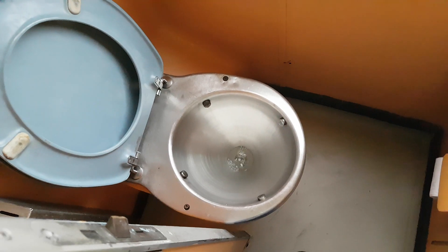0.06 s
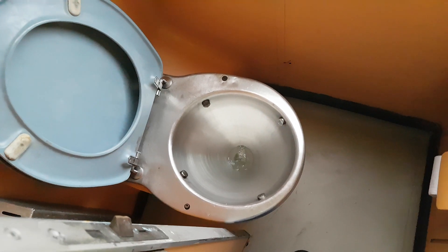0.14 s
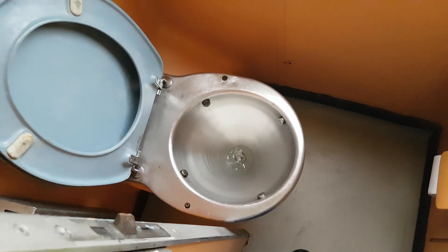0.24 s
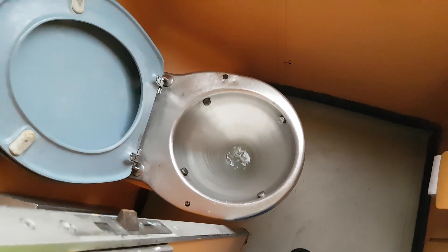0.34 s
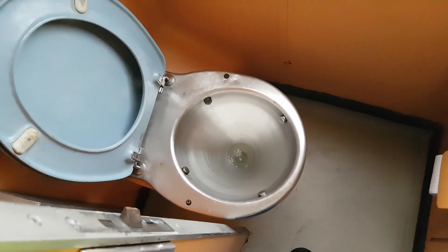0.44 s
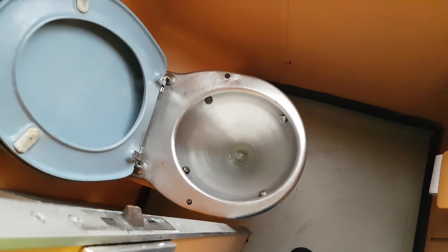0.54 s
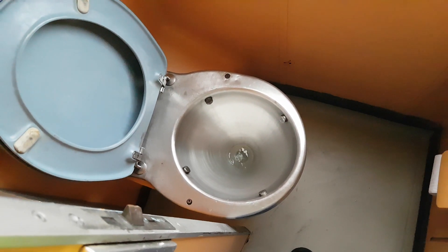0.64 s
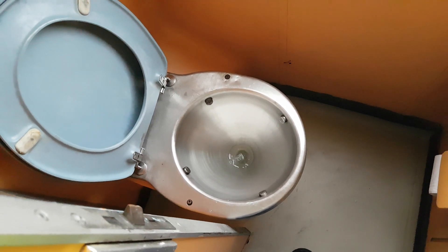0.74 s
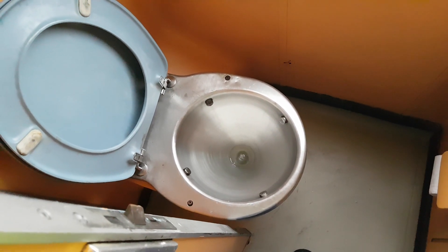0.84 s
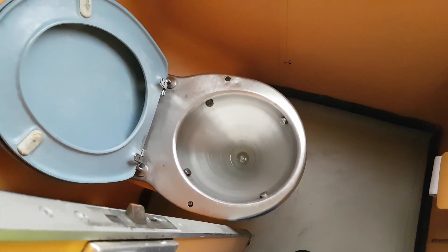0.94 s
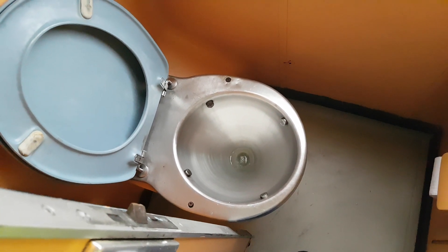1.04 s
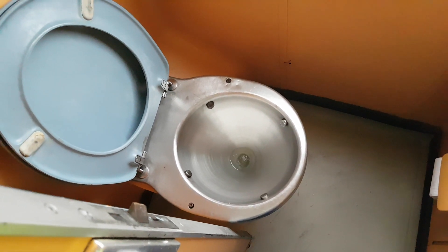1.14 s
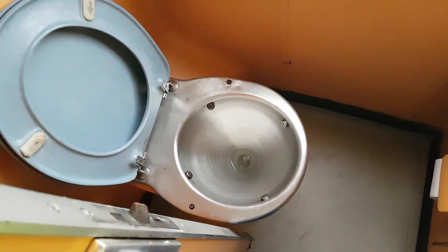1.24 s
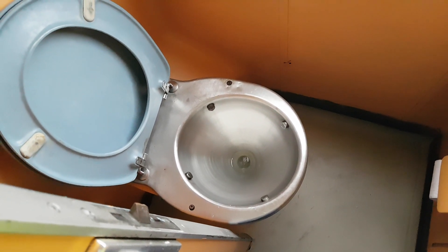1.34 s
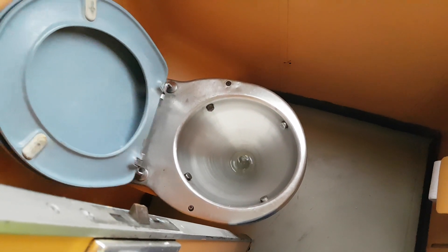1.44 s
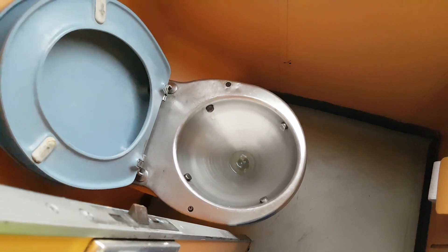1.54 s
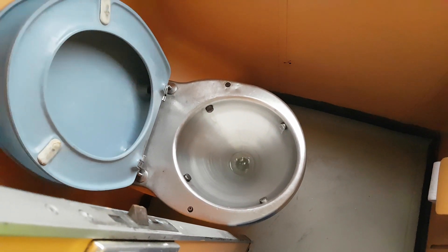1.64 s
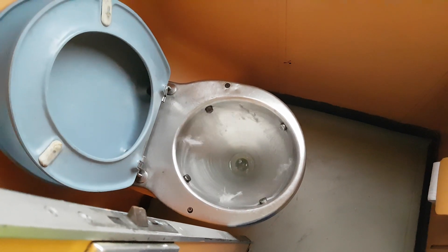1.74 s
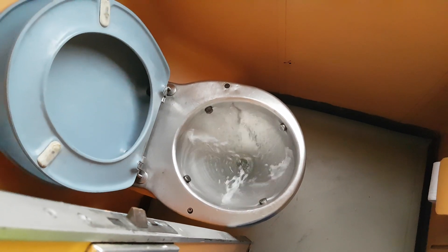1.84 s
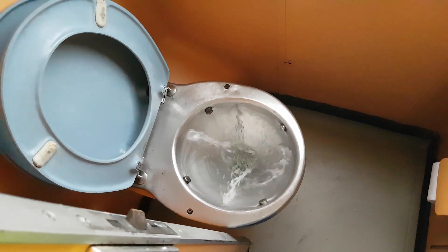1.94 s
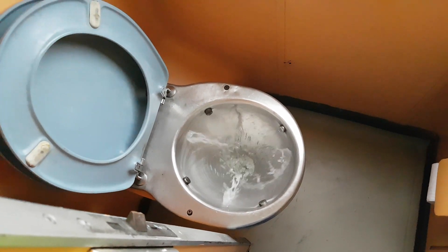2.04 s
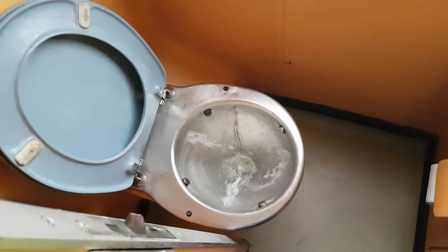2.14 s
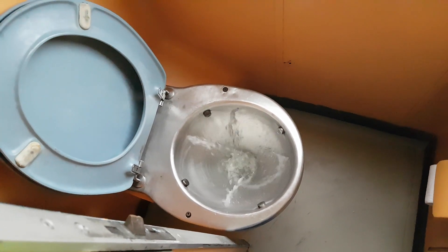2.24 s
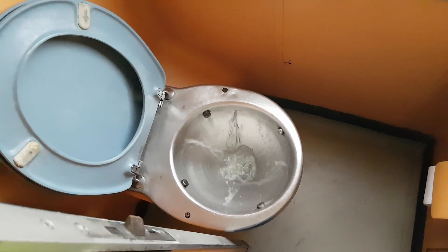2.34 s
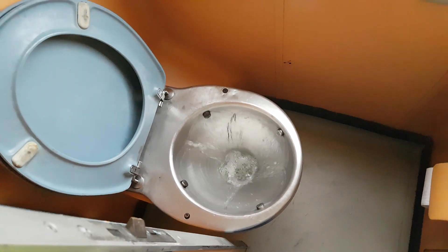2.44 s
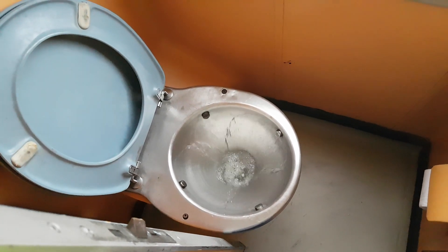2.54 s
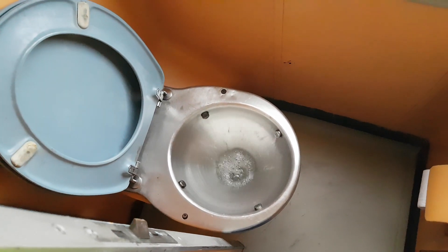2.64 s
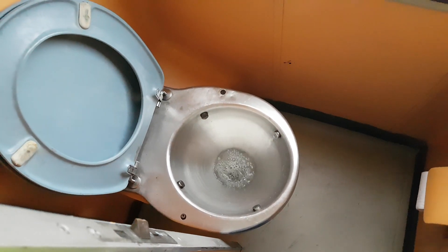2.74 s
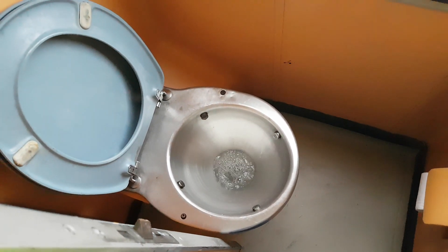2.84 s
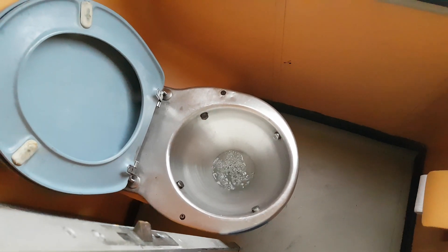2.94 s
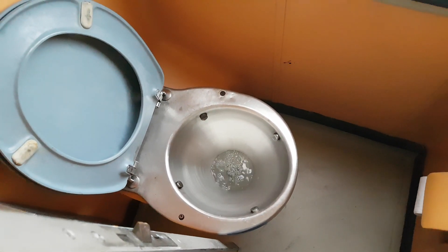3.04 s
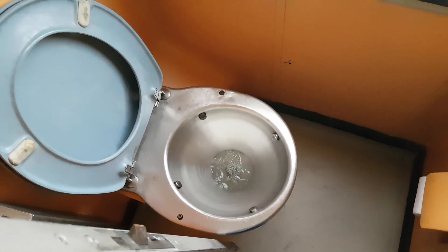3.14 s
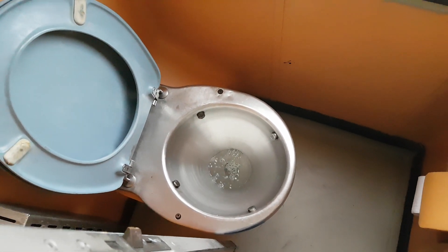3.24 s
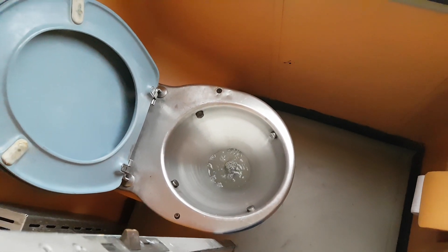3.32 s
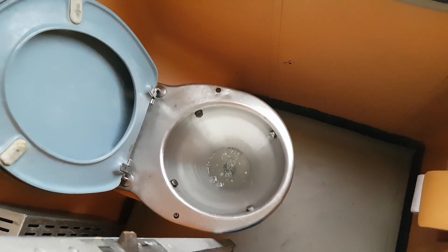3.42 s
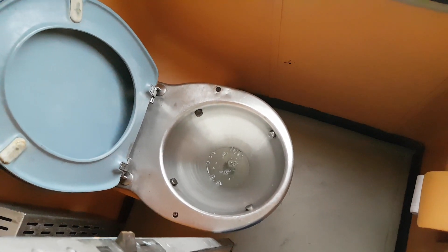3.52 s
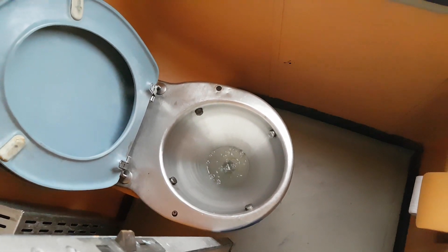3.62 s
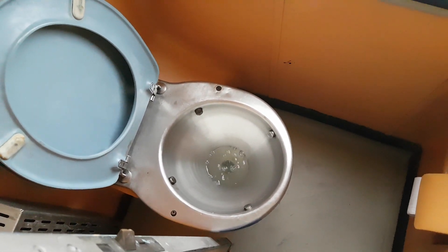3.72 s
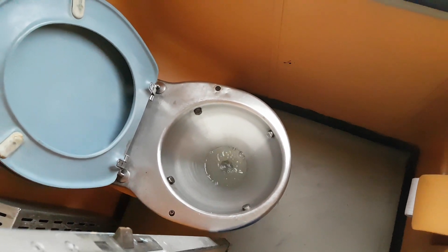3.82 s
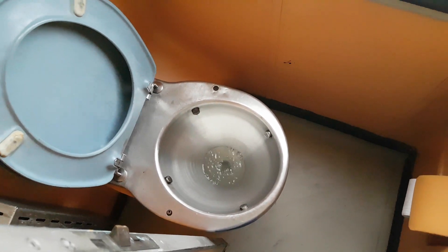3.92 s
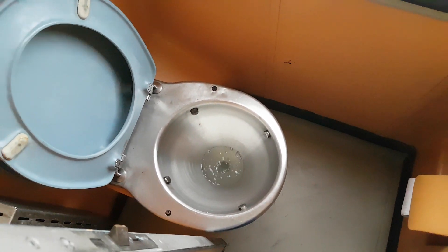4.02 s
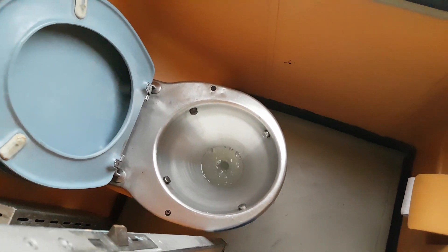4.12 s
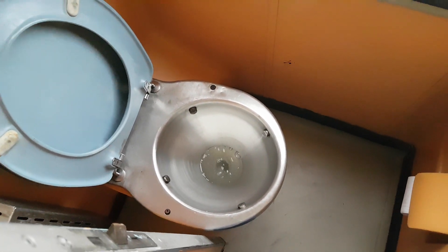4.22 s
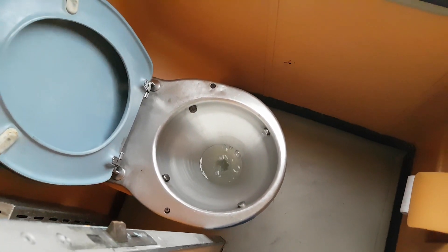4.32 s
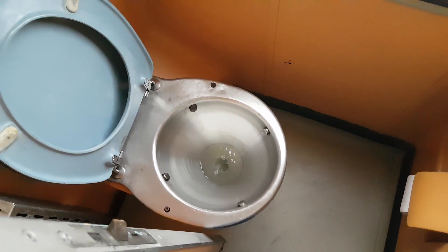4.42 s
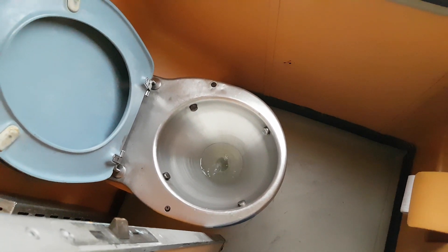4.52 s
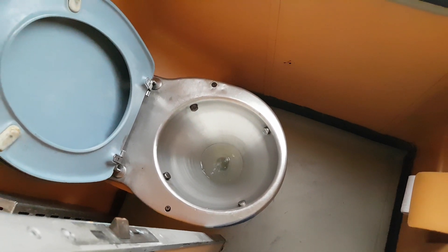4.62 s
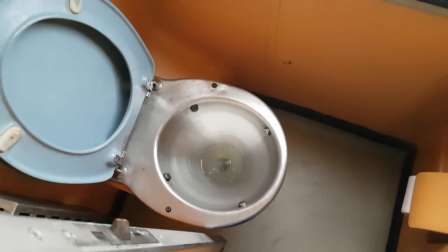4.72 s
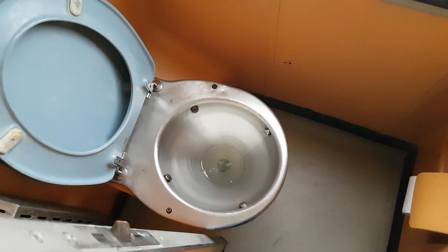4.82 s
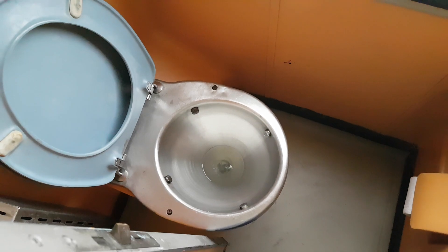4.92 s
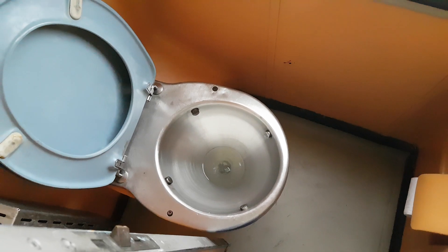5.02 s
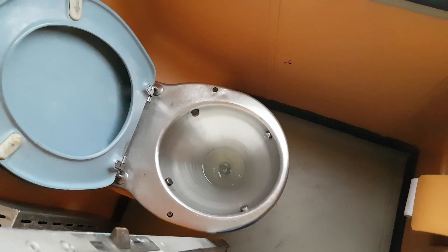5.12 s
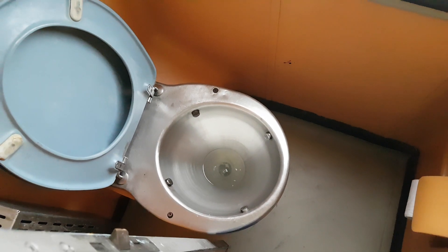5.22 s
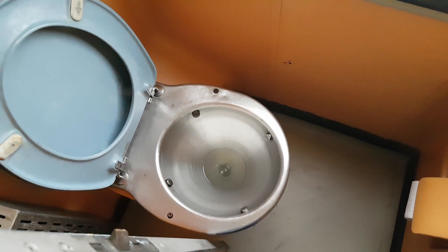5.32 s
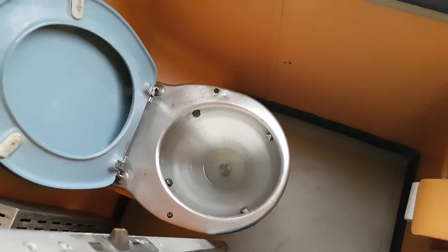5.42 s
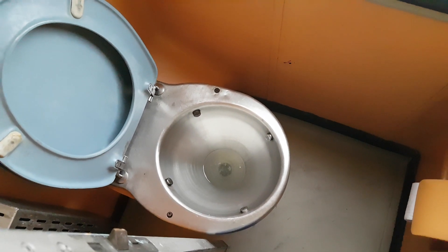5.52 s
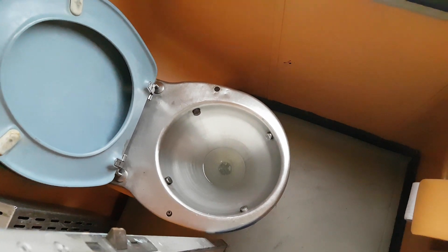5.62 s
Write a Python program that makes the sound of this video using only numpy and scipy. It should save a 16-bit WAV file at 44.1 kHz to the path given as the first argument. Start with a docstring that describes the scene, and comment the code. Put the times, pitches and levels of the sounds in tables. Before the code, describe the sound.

Close to the microphone in a cramped train toilet, a quiet pipe hiss is broken by a sharp burst of air and a hollow, booming bang. Rinse water fizzes against the metal bowl, which hums briefly under suction amid further blasts. After a lull of hiss, rumble and two small drips, the vacuum flush vents and bangs twice more, then fades as a faint refill trickle begins.

```python
"""A vacuum toilet in a small train cubicle, close up on a stereo pair of microphones. A valve seat ticks
and the air ejector hisses through its pipe. At 1.4 s a valve vents a whistling blast and slugs of air and
water bang through the steel bowl; from here on the cabinet booms and throbs. Rinse jets spray, the bowl
hums under suction among more blasts and slugs, and two drips fall near 3 s. Vents and slugs hit again
near 3.9 s and 5.1 s, then the hiss falls away and the tank starts to refill."""
import sys
import numpy as np
from scipy import signal
from scipy.fft import rfft, irfft
from scipy.io import wavfile
from scipy.ndimage import uniform_filter1d

SR = 44100
rng = np.random.default_rng(int(sys.argv[2]) if len(sys.argv) > 2 else 0)


def waveform_to_disk(signal):
    """Save audio, clipped to [-1, 1], as 16-bit WAV at the path in sys.argv[1]."""
    frames = np.transpose(np.atleast_2d(signal))
    scaled = np.clip(frames, -1, 1) * 32767
    samples = np.round(scaled).astype(np.int16)
    wavfile.write(sys.argv[1], SR, samples)


N = 250047
TIME = np.arange(N) / SR

# slugs striking the bowl: t/s, level/dB, rise/s, t60/s, tilt/(dB per octave), hollow f/Hz
SLUGS = [(0.174, -40.5, .0036, 0.19, -3, 895), (1.455, -20, 0.0019, 0.51, 0, 1500),
         (1.472, -8.5, 0.0061, 0.29, 0.3, 2100), (1.512, -12.5, 0.015, 0.23, 3.5, 2820),
         (1.612, -16, .001, 0.19, -0.3, 3940), (1.734, -27.5, 0.0061, 0.27, 2, 1630),
         (2.192, -18.5, 0.0022, 0.29, -1.1, 1070), (2.296, -36.5, 0.0044, 0.55, -6.5, 990),
         (2.4, -14, 0.0041, 0.23, 0.8, 940), (2.595, -31, 0.026, 0.24, -3, 2060),
         (2.64, -42, .014, 0.71, -2, 2050), (2.841, -41.5, 0.0024, 0.68, -3, 1970),
         (3.035, -46, 0.0061, 0.23, -8, 2200), (3.195, -49.5, .005, 0.13, 6, 2200),
         (3.467, -42.5, .002, .35, -1.5, 860), (3.62, -39.5, 0.14, 1, -0.9, 2620),
         (3.924, -17.5, 0.0022, .23, 4, 1300), (3.941, -10, 0.002, 0.38, 0.3, 2100),
         (3.991, -18.5, 0.019, .27, 5, 2530), (4.049, -24, 0.0042, 0.36, -2.5, 2800),
         (4.292, -28, 0.0029, 0.18, -4.5, 1940), (4.346, -31, .0012, 0.25, -0.5, 2190),
         (4.414, -35.5, 0.0014, .24, -2, 1785), (5.093, -28, .0036, 0.41, -4.5, 1100),
         (5.154, -14.5, 0.0039, 0.28, -0.7, 3660), (5.2, -34.5, .013, 0.23, 8.5, 2200),
         (5.3, -52, 0.039, 1, -4.5, 905), (5.567, -60.5, 0.0024, 0.4, -9.5, 590)]
SLUG_COLOUR = [(210, -11.5), (350, -3.5), (665, -8.5), (1530, -7), (2080, -4.5), (2320, -7), (2520, -6),
               (5190, -15), (9090, -46), (13800, -42), (16200, -51)]  # spectrum of the bangs: f/Hz, level/dB
SLUG_DECAY = [(300, 1.13), (2000, 0.91), (6000, 0.93), (16000, 0.25)]  # decay across the spectrum: f/Hz, factor on t60
BOWL_MODES = [(483, 25, 7), (543, 25, 5), (820, 50, 5), (1030, 60, 8), (1170, 30, 4), (1688, 35, 5),
              (1858, 35, 6), (1970, 35, 4), (2040, 60, 6), (2140, 35, 3), (2470, 40, 6), (3461, 40, 4),
              (3624, 40, 5)]  # modes of the steel bowl: f/Hz, width/Hz, lift/dB
SEAT_TICKS = [(0.149, -43), (5.551, -49)]  # dry ticks of a valve seat: t/s, level/dB


def slugs():
    """Ragged bangs, each with the hollow of its air pocket, and valve-seat ticks ring the bowl."""
    frames = dict(nperseg=128, noverlap=96)
    hz, t, noise = signal.stft(air() * flutter(1.5, .004), SR, **frames)
    decay = read(SLUG_DECAY, hz)[:, None]  # the treble dies first
    pitch = hz[:, None] + 150
    power = np.zeros(noise.shape[1:])
    for s, db, rise, t60, tilt_db, hollow_hz in SLUGS:
        at = (t > s) & (t < s + .55)
        slope_db = tilt_db * np.log2(pitch / 2000)
        hollow_db = 6.1 * np.exp(-(np.log2(pitch / hollow_hz) / 0.44) ** 2)
        power[:, at] += (amp(db + slope_db + hollow_db) * burst(t[at] - s, rise, t60 * decay)) ** 2
    for s, db in SEAT_TICKS:
        power += (amp(db) * burst(t - s, rise=0.0022, t60=0.0073)) ** 2
    bangs = signal.istft(noise * np.sqrt(power), **frames)[1][:, :N]
    return colour(bangs, SLUG_COLOUR, BOWL_MODES)


# valve blasts: t/s, hiss level/dB, rise/s, open/s, edge tone index, whistle level/dB
VENTS = [(1.396, -14, 0.0085, 0.061, 0, -15.5), (1.613, -36.5, .002, 0.0042, 0, -62),
         (2.298, -19, 0.008, 0.085, 1, -29), (2.325, -31, 0.018, 0.048, 1, -15),
         (3.68, -54, .015, .03, 1, -57), (3.826, -15, .006, 0.064, 0, -15.5),
         (3.94, -35, .004, .06, 0, -45.5), (4.05, -41, .004, .01, 0, -58.5),
         (5.055, -17, 0.0084, 0.12, 1, -14.5), (5.085, -31.5, .023, 0.049, 2, -21)]
VENT_COLOUR = [(250, -31.5), (400, -7), (1300, -3.5), (1800, -11), (2500, -3.5), (3400, -5), (5000, -0.5),
               (7600, -3.5), (9150, -10), (10500, -0.5), (12500, 0.5), (14500, -6.5), (16300, -23.5)]  # spectrum of the escaping air: f/Hz, level/dB
EDGE_TONES = [
    [(12370, 400, 0), (11300, 1000, -1), (2500, 200, -10)],
    [(13930, 400, 0), (14800, 2600, 0), (7300, 800, -9)],
    [(5700, 260, 0), (6830, 400, -4)],
]  # valve whistles, one list each: f/Hz, width/Hz, level/dB
EDGE_FADES = [.2, 0.44, .6]  # each whistle's own fade within its blast: t60/s


def vents():
    """Each whistling blast starts at once, sags while the valve is open and dies fast when it shuts."""
    jet = air() * flutter(0.93, 0.0018)
    rush = colour(jet, VENT_COLOUR)
    tones = [resonate(jet, modes) for modes in EDGE_TONES]
    treble = signal.oaconvolve(rush, signal.firwin(63, 9000, pass_zero=False, fs=SR)[None], "same")
    out = np.zeros((2, N))
    for s, db, rise, open_s, edge, whistle_db in VENTS:
        at = window(s, .6)
        t = TIME[at] - s
        shutting = amp(-240 * np.maximum(t - open_s, 0))
        hiss = rush[:, at] - treble[:, at] * (1 - amp(-90 * t))  # thins as the pressure falls
        whistle = tones[edge][:, at] * amp(-60 * t / EDGE_FADES[edge])
        out[:, at] += burst(t, rise, t60=1) * shutting * (amp(db) * hiss + amp(whistle_db) * whistle)
    return out


# the hiss as heard: swells with the loud bangs, ducks after them, slowly recovers,
# falls away near the end: t/s, level/dB
HISS_LEVEL = [(0, -61.5), (.16, -60.5), (.178, -40.5), (.26, -45), (.7, -46.5), (1.35, -47), (1.6, -37.5),
              (1.72, -55), (2.7, -44.5), (3.8, -45.5), (4.1, -40.5), (4.2, -56), (4.55, -56), (4.7, -51.5),
              (5.03, -45.5), (5.25, -47), (5.36, -62), (5.6, -66.5), (5.67, -52)]
HISS_COLOUR = [(100, -34), (170, -34), (230, -16), (500, -18.5), (900, -11), (1500, -14.5), (3000, -16),
               (5700, -16), (6400, -25.5), (7500, -19), (9200, -31), (13500, -23.5), (16300, -29.5)]  # spectrum of the hiss: f/Hz, level/dB
PIPE_MODES = [(282, 40, 7), (348, 30, 5.5), (442, 14, 20), (587, 68, 10.5), (663, 29, 3), (863, 160, 9.5),
              (1089, 39, 11), (1200, 17, -0.5), (1346, 22, 6.5), (1660, 31, 12.5), (1970, 98, 9),
              (2150, 78, 6.5), (2290, 40, 10), (2650, 27, 2), (3120, 3.3, 12), (3900, 450, 5),
              (5110, 56, 8.5), (5400, 120, 5), (7600, 560, 2)]  # resonances of the ejector pipe: f/Hz, width/Hz, lift/dB


def ejector():
    """Steady jet noise coloured by its pipe."""
    jet = air() * flutter(0.7, 0.044)
    return amp(curve(HISS_LEVEL)) * colour(jet, HISS_COLOUR, PIPE_MODES)


# rinse jets on steel: t/s, level/dB
SPRAY_LEVEL = [(1.725, -50), (1.746, -29.5), (1.774, -31), (1.898, -26.5), (2.176, -22.5), (2.38, -21.5),
               (2.576, -29.5), (2.682, -49.5), (2.72, -57)]
SPRAY_COLOUR = [(250, -19), (450, -12.5), (700, -17.5), (900, -8), (1200, -12), (1900, -3), (3100, -5.5),
                (5800, 0.5), (7500, -4), (9200, -11.5), (11000, -8), (13500, -6), (16300, -15.5)]  # spectrum of the spray: f/Hz, level/dB
REFILL_LEVEL = [(5.59, -70), (5.6, -53.5), (5.65, -48.5), (5.67, -49)]  # refill trickle: t/s, level/dB
REFILL_COLOUR = [(880, -48.5), (1500, -9), (2130, -19.5), (2490, -6), (3260, -15.5), (6110, -4),
                 (16200, -33)]  # spectrum of the trickle: f/Hz, level/dB


def rinse():
    """Dense fizz of water jets lightly rings the bowl; later a thin trickle refills the tank."""
    light_modes = [(hz, width, .5 * lift) for hz, width, lift in BOWL_MODES]
    jets = air() * flutter(0.95, 0.0083)
    spray = amp(curve(SPRAY_LEVEL)) * colour(jets, SPRAY_COLOUR, light_modes)
    refill = amp(curve(REFILL_LEVEL)) * colour(jets, REFILL_COLOUR)
    return spray + refill


THUMPS = [(1.39, -42, -39), (1.45, -25.5, -40.5), (1.54, -33, -29), (1.75, -42.5, -56), (1.91, -41, -65),
          (2.16, -34.5, -38.5), (2.22, -31.5, -31), (2.285, -28, -40), (2.362, -21, -24.5),
          (2.42, -22, -26.5), (2.619, -25.5, -31.5), (2.98, -35.5, -35.5), (3.16, -40.5, -53),
          (3.33, -43.5, -57), (3.44, -40.5, -63), (3.6, -31, -49.5), (3.71, -33.5, -47),
          (3.802, -30.5, -30), (3.915, -14.5, -20.5), (3.98, -26, -24), (4.33, -40, -49), (4.66, -47, -54),
          (4.83, -43, -44), (5.03, -29.5, -35), (5.119, -20.5, -27.5), (5.19, -23, -24.5), (5.59, -43, -49)]  # pipework shaking the cabinet: t/s, boom level/dB, drone level/dB
MURMUR = [(0, -78), (1.36, -75), (1.45, -62.5), (2.5, -46.5), (5.0, -49), (5.67, -52.5)]  # pipework between thumps: t/s, level/dB
BOOM_MODES = [(56.6, 24.3, -0.5), (111.9, 29.7, 3), (80.8, 13, -2.5), (144.7, 31, -2)]  # low panel modes: f/Hz, width/Hz, level/dB
DRONE_MODES = [(270.4, 23, -0.5), (320.6, 78, -0.5)]  # higher panel modes: f/Hz, width/Hz, level/dB
THROBS = [(0.175, -40, 261.5, 0.069), (1.456, -10, 291, 0.022), (1.473, -12.5, 340, 0.042),
          (1.511, -18, 325, 0.067), (1.618, -34, 275, 0.062), (1.931, -37.5, 260, 0.017),
          (2.093, -41, 293, 0.085), (2.206, -16.5, 310, 0.012), (2.275, -32, 300, 0.065),
          (2.355, -20, 268, 0.016), (2.399, -23, 350, 0.055), (2.572, -29.5, 262, 0.046),
          (2.63, -22, 262, 0.064), (2.837, -30.5, 274, 0.045), (2.976, -29, 265, 0.037),
          (3.065, -34, 264, 0.029), (3.127, -28.5, 274, 0.037), (3.306, -36.5, 260, 0.048),
          (3.443, -27, 261, 0.054), (3.568, -39, 264, 0.041), (3.602, -33.5, 267.6, 0.052),
          (3.742, -26.5, 256, 0.058), (3.858, -25, 274, 0.075), (3.925, -8, 311, 0.016),
          (3.969, -10.5, 340, 0.017), (4.006, -17.5, 270.4, 0.05), (4.307, -32, 333, 0.038),
          (4.409, -37, 312, 0.03), (4.606, -36, 262, 0.077), (4.848, -38, 256, 0.1),
          (4.939, -34.5, 265, 0.042), (5.053, -24, 302, 0.02), (5.116, -19.5, 267.3, 0.15),
          (5.15, -18, 349, 0.074), (5.176, -16, 266.3, 0.054), (5.224, -33.5, 259, 0.06),
          (5.294, -33, 269, 0.06)]  # throbs of one panel: t/s, level/dB, f/Hz, length/s
OPENING_THROB = (.195, -52, 88, .23)  # low ring as the air comes on: t/s, level/dB, f/Hz, length/s


def cabinet():
    """Pipework thumps and murmurs in the cabinet's panel modes; one panel swells in single throbs."""
    power = amp(curve(MURMUR)) ** 2 + np.zeros((2, N))
    for s, *levels_db in THUMPS:
        at = window(s, .7)
        power[:, at] += (amp(levels_db)[:, None] * burst(TIME[at] - s, rise=0.023, t60=0.46)) ** 2
    boom, drone = np.sqrt(power)
    push = signal.lfilter(*signal.butter(2, 42, "high", fs=SR), air())  # small panels move no deep bass
    out = boom * resonate(push, BOOM_MODES) + drone * resonate(push, DRONE_MODES)
    for s, db, hz, length in THROBS + [OPENING_THROB]:
        at = window(s, length)
        t = np.maximum(TIME[at] - s, 0)
        swell = np.sin(np.pi * np.sqrt(t / length))
        out[:, at] += amp(db) * swell * np.sin(2 * np.pi * (hz * t + rng.random()))
    return out


HUM_LEVEL = [(2.1, -52), (2.2, -31), (2.3, -38), (2.41, -27.5), (2.55, -47), (2.62, -34), (2.75, -59),
             (2.9, -62)]  # hum of the bowl: t/s, level/dB
HUM_MODES = [(1962, 120, 1.5), (2120, 180, -2.5), (1030, 90, -5)]  # the bowl's narrow note: f/Hz, width/Hz, level/dB


def bowl_hum():
    """Uneven air noise sounds the bowl's note while suction draws the rinse water down."""
    return amp(curve(HUM_LEVEL)) * resonate(air() * flutter(2.5, 0.022), HUM_MODES)


DRIPS = [(3.033, -42.5, 2470, 2160, 0.031), (3.187, -45, 1660, 1660, 0.023)]  # drips in the bowl: t/s, level/dB, start f/Hz, end f/Hz, length/s


def drips():
    """Short bubble tones in the standing water."""
    out = np.zeros(N)
    for s, db, from_hz, to_hz, length in DRIPS:
        at = window(s, length)
        progress = (TIME[at] - s) / length
        hz = from_hz + (to_hz - from_hz) * progress
        out[at] += amp(db) * np.sin(np.pi * progress) * np.sin(2 * np.pi * np.cumsum(hz) / SR)
    return out


FLOOR_COLOUR = [(15, -6), (35, -1), (60, -13.5), (150, -19.5), (1000, -23), (5000, -46), (16300, -40.5)]  # spectrum of the noise floor: f/Hz, level/dB


def room_tone():
    """Steady noise of the standing carriage and the microphones."""
    return amp(-63) * colour(air(), FLOOR_COLOUR)


def cubicle(x):
    """Close hard walls add a short dense tail, different at each microphone."""
    t, t60 = TIME[:6000], .12
    tail = air()[:, :len(t)] * amp(-60 * t / t60) * (t > .002)
    reflections = signal.oaconvolve(x.mean(0)[None], tail / np.linalg.norm(tail[0]), axes=1)[:, :N]
    return x + amp(-7.5) * reflections


MIC_LIKENESS = [(60, 1), (150, 0.84), (380, 0.93), (950, 0.4), (2380, 0.047), (5980, -0.059),
                (15000, -0.035)]  # likeness across the pair: f/Hz, correlation


def air():
    """White noise at two microphones: alike in the bass, less so in the treble."""
    left, other = rfft(rng.standard_normal((2, N)))
    same = read(MIC_LIKENESS, np.fft.rfftfreq(N, 1 / SR))
    right = same * left + np.sqrt(1 - same ** 2) * other
    return irfft(np.array([left, right]), N)


def flutter(depth_db, smooth_s):
    """Turbulent unevenness shared by all frequencies."""
    wobble = unit_rms(uniform_filter1d(rng.standard_normal(N), round(smooth_s * SR)))
    return unit_rms(amp(depth_db * wobble))


def colour(x, spectrum, modes=()):
    """Causal filter of power gain 1: a broad spectrum with resonant humps on it."""
    hz = abs(np.fft.fftfreq(8192, 1 / SR))
    humps_db = sum(lift / (1 + (2 * (hz - f) / width) ** 2) for f, width, lift in modes)
    log_gain = np.log(amp(np.maximum(read(spectrum, hz) + humps_db, -100)))
    minimum_phase = np.exp(np.conj(signal.hilbert(log_gain)))
    taps = np.fft.ifft(minimum_phase).real[:4096]
    return signal.oaconvolve(x, taps[None] / np.linalg.norm(taps), axes=1)[:, :N]


def resonate(x, modes):
    """Narrow rings, each with a doubled pole for steep skirts, summed to unit RMS."""
    out = 0
    for hz, width, db in modes:
        pole = np.exp((2j * hz - width) * np.pi / SR)
        out = out + amp(db) * unit_rms(signal.lfilter([1], np.poly([pole, pole]), x).real)
    return unit_rms(out)


def burst(t, rise, t60):
    """Smooth rise, then exponential decay."""
    return np.sin(np.pi / 2 * np.clip(t / rise, 0, 1)) * amp(-60 * np.maximum(t - rise, 0) / t60)


def curve(points):
    """Level in dB over time, silent outside its points."""
    return np.interp(TIME, *np.transpose(points), left=-120, right=-120)


def read(points, hz):
    """Interpolate along a logarithmic frequency axis."""
    f, value = np.transpose(points)
    return np.interp(np.log(hz + 1), np.log(f + 1), value)


def window(s, length):
    return slice(round(s * SR), round((s + length) * SR))


def amp(db):
    return 10 ** (np.asarray(db) / 20)


def unit_rms(x):
    return x / np.sqrt(np.mean(x ** 2) + 1e-20)


def placed(x, left_db):
    return x * amp([[left_db / 2], [-left_db / 2]])


def scene():
    """Air and water close to the pair; cabinet and room tone underneath."""
    jets = placed(ejector(), .3) + placed(rinse(), 0.282) + placed(vents(), .3)
    bowl = placed(slugs() + drips() + bowl_hum(), left_db=1.5)
    return room_tone() + cubicle(jets + bowl) + placed(cabinet(), .3)


MIC_BALANCE = [(60, 3), (110, -1.5), (200, -1.5), (380, -1.5), (700, -1.5), (1290, -5), (2380, -7.5),
               (4400, -3), (8120, -2), (15000, -6)]  # colour difference across the pair: f/Hz, left minus right/dB


def record(dry):
    """The two microphones differ in colour; the loudest peaks flatten softly; then the band limit."""
    lean_db = read(MIC_BALANCE, np.fft.rfftfreq(N, 1 / SR)) / 2
    at_mics = irfft(rfft(dry) * amp([lean_db, -lean_db]), N)
    softened = np.tanh(at_mics / 1.28) * 1.194
    lowpass = signal.firwin(767, 16350, window=("kaiser", 9), fs=SR)
    return signal.oaconvolve(softened, lowpass[None], "same")


dry = scene()
out = record(dry)
waveform_to_disk(out)
```